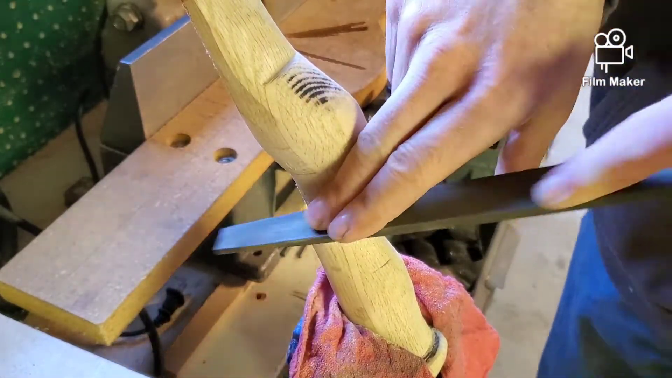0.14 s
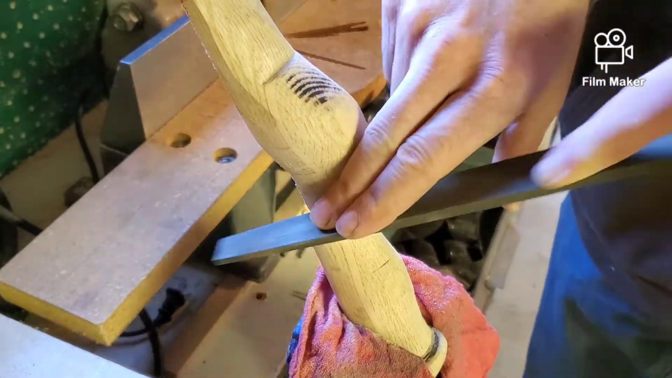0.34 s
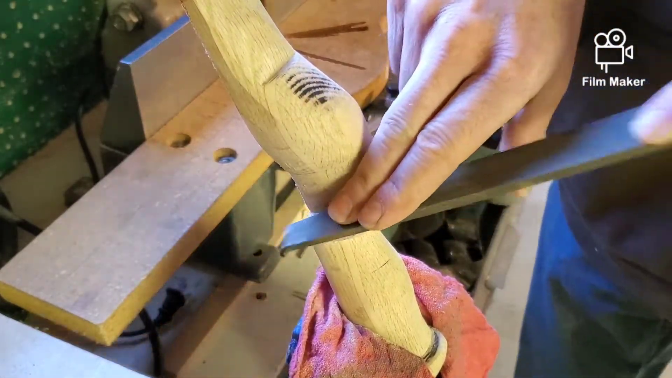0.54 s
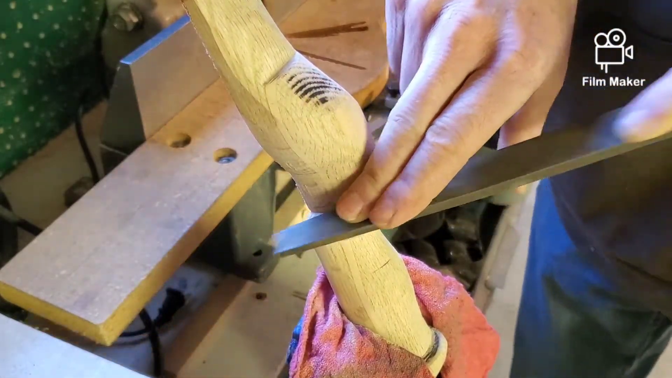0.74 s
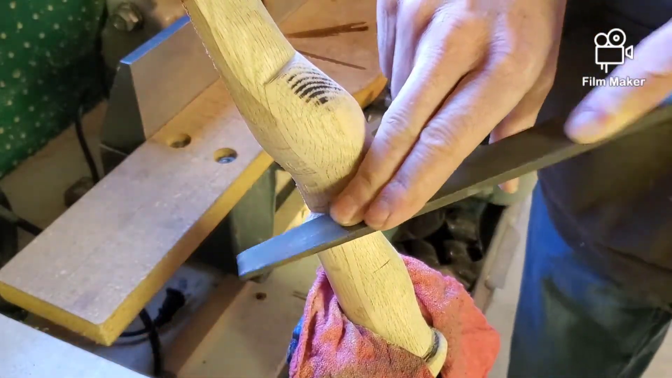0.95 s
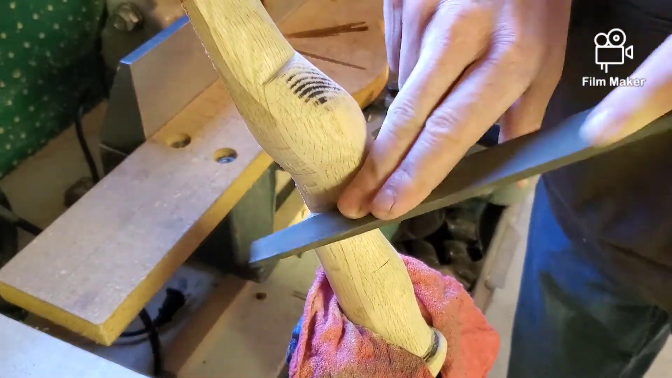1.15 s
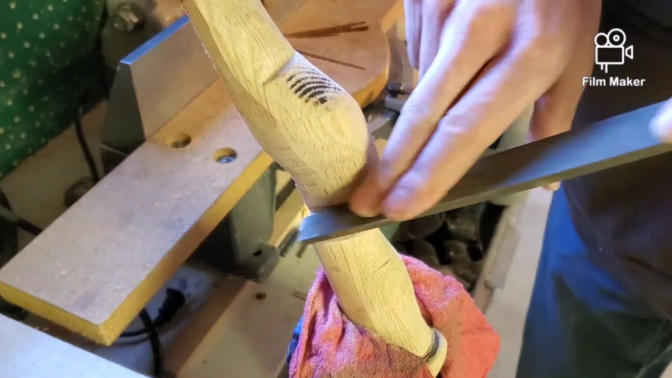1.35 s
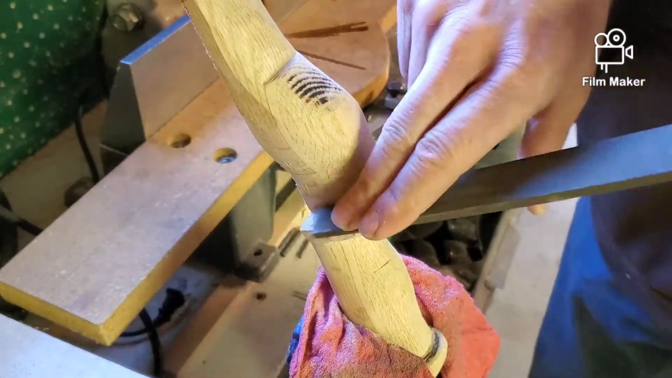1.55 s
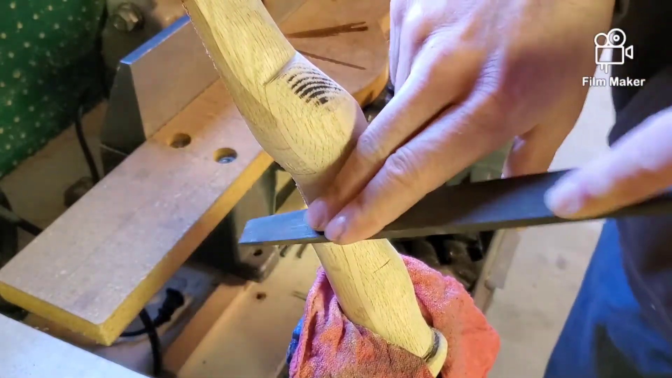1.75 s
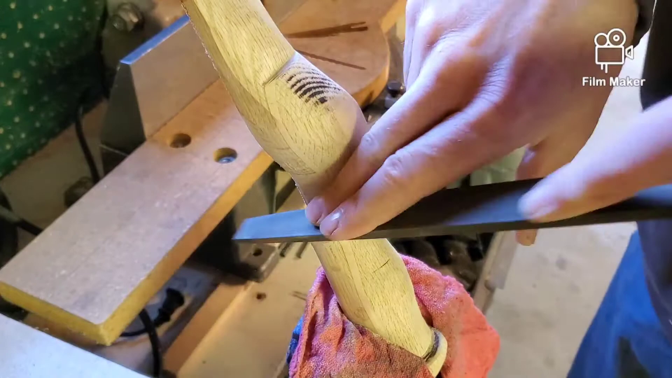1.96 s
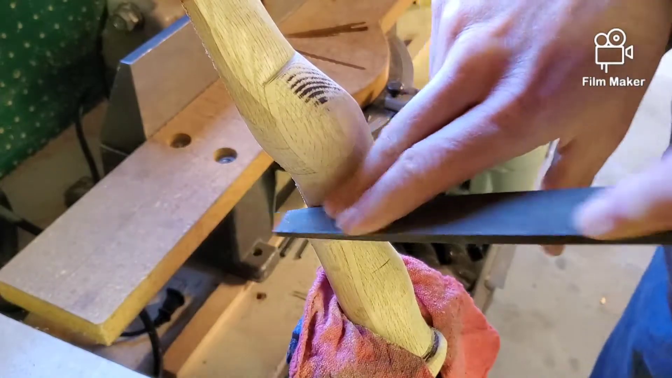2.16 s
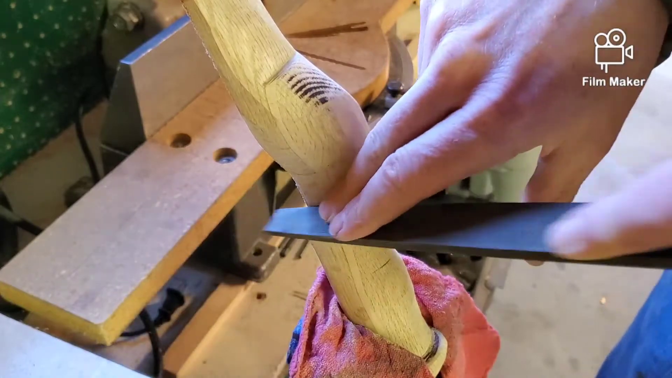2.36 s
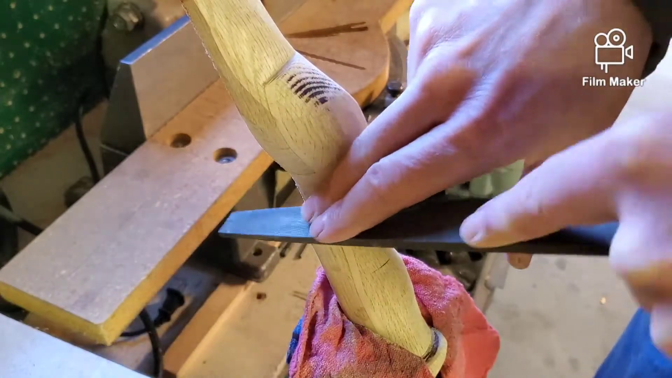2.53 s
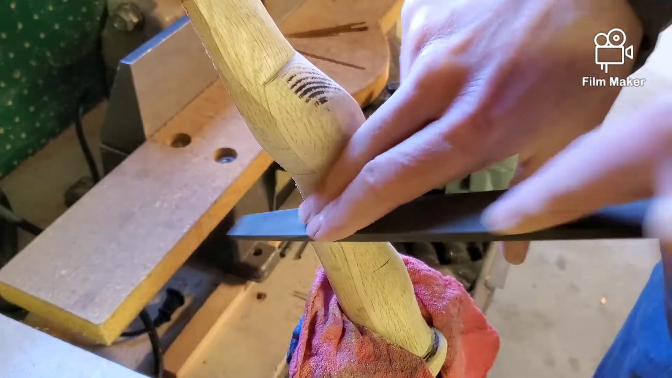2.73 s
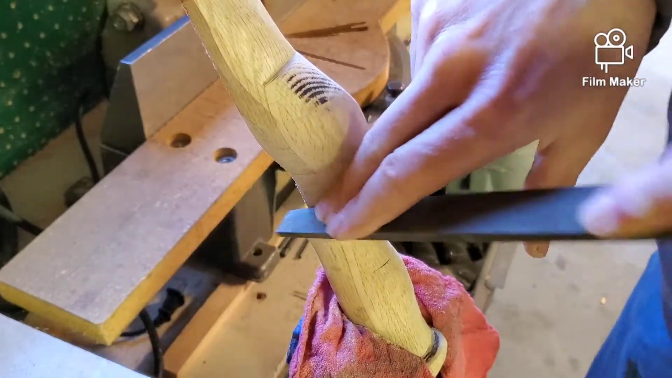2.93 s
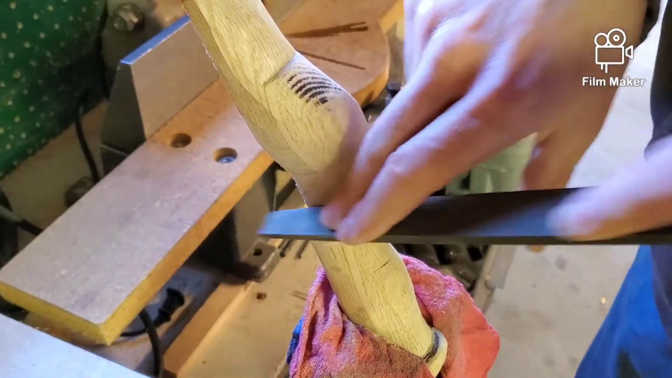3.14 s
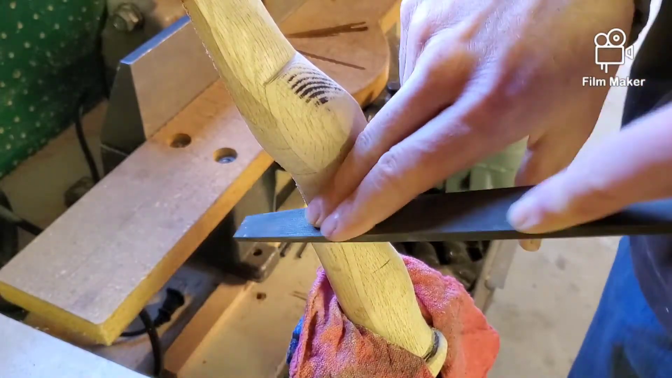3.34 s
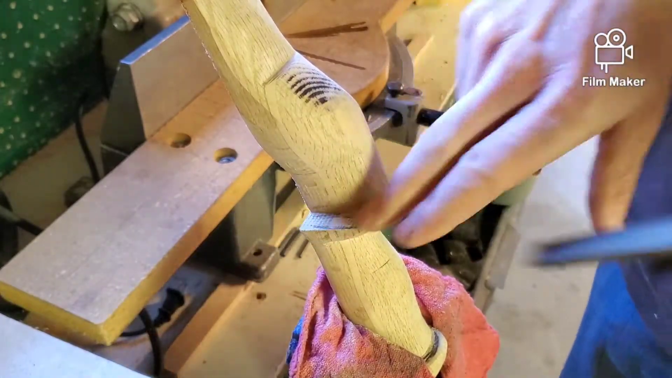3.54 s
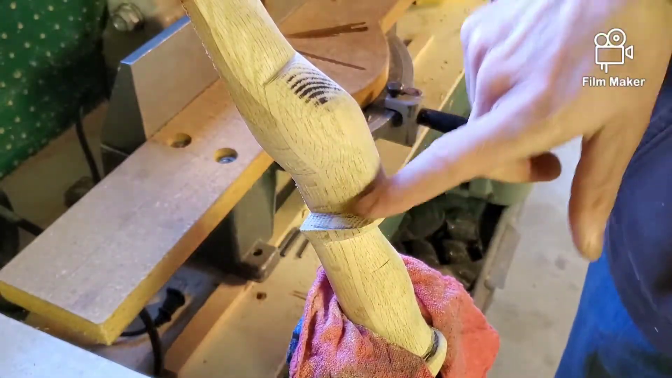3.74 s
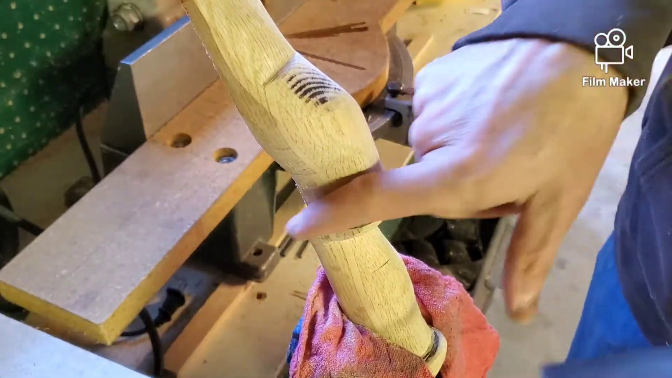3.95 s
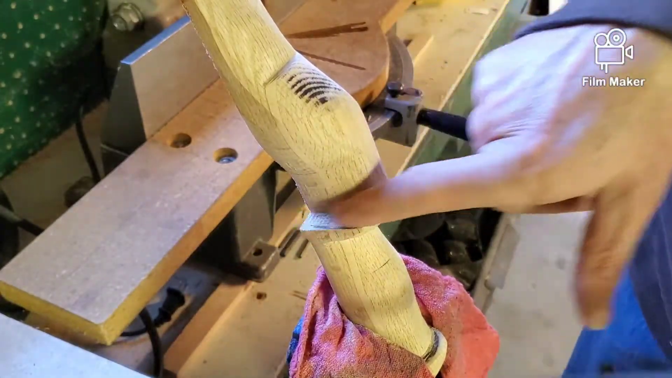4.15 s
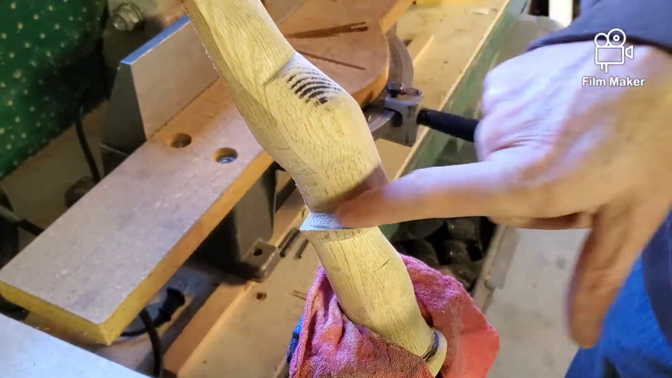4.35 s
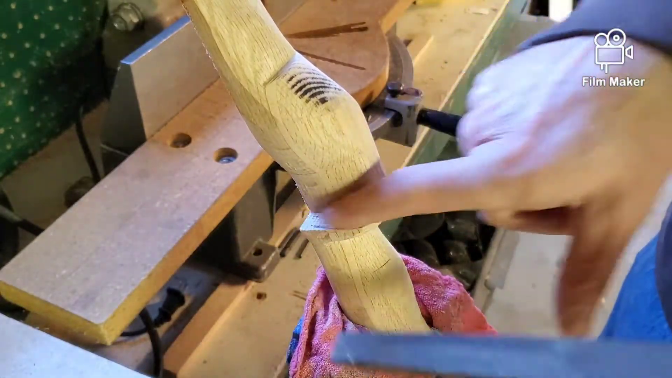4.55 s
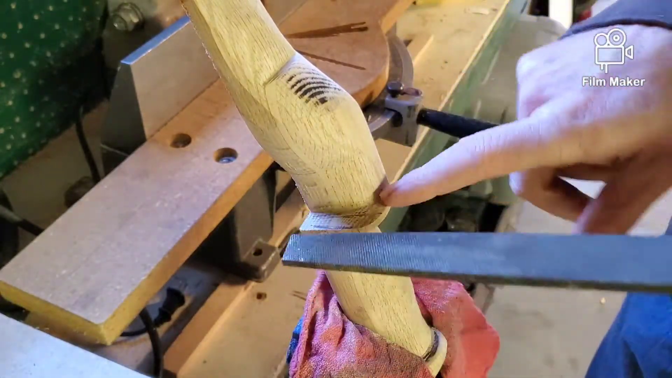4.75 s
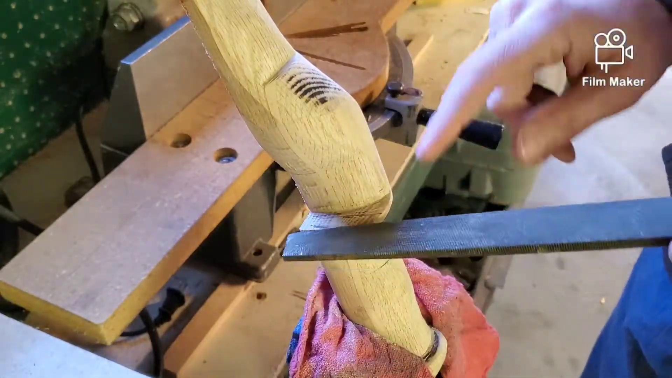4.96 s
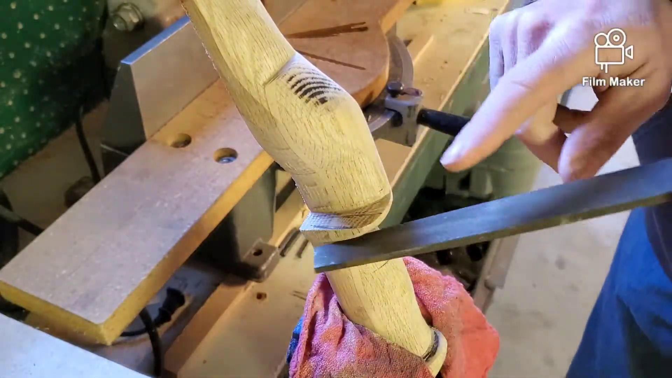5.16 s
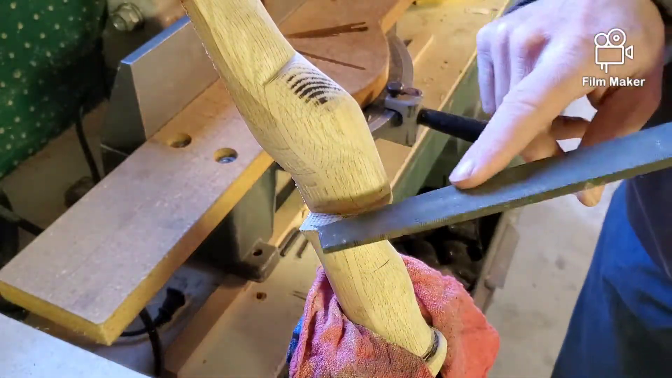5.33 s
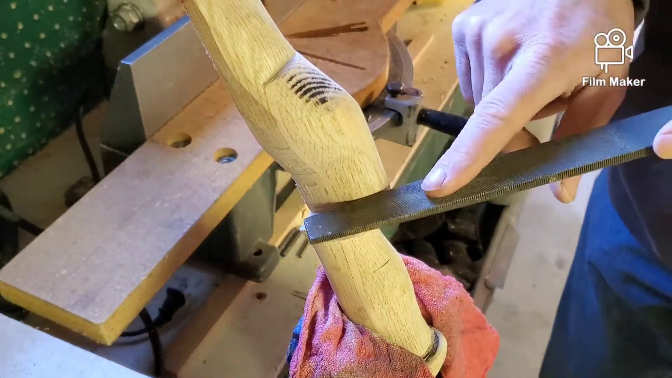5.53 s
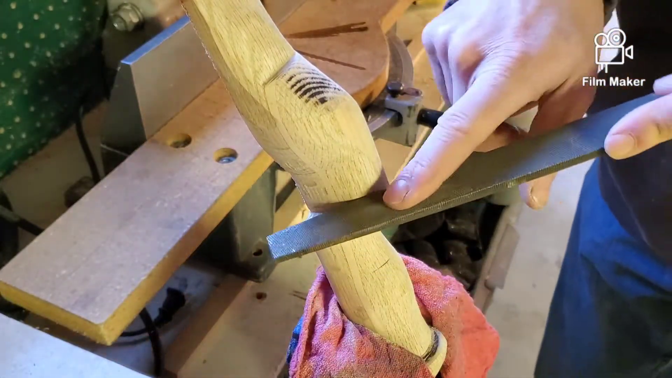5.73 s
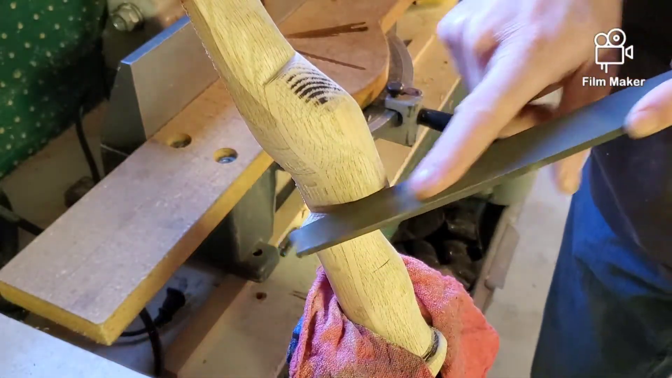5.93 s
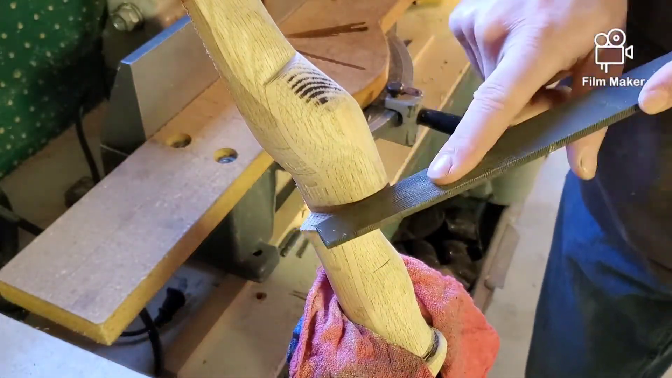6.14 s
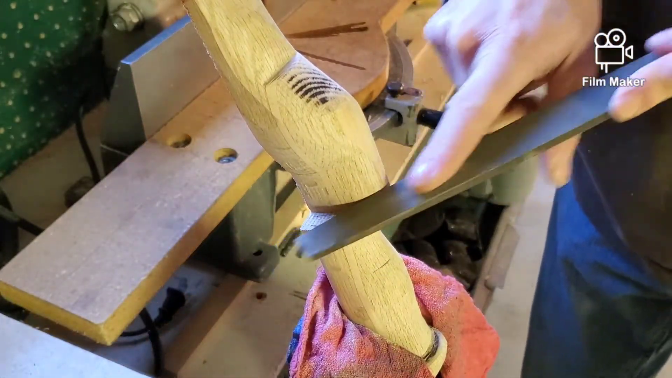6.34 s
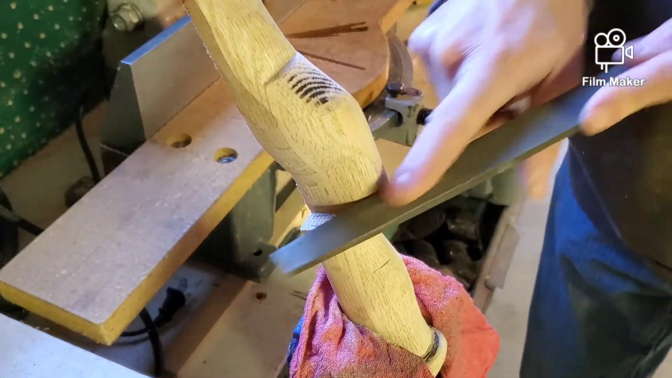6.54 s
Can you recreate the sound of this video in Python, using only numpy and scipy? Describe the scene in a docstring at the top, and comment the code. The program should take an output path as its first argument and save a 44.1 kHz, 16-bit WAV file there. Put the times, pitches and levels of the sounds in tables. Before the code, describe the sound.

Close up in a small workshop, a flat steel file rasps fast over a wooden handle, about seven or eight strokes a second, with woody hum, knocks and short squawks. It stops; a fingertip makes very faint papery wipes and a soft nudge. The file lightly grazes, makes two muted separate passes, then returns to fast, loud rasping.

```python
"""Rapid rasping strokes, a pause with papery wipes, a soft nudge and a faint graze, then strokes again.
A flat steel file is pushed to and fro across a wooden handle held in a vise, in a small workshop.
Uneven slips of the teeth ring modes of handle, bench and file; coloured noise is the hiss of fine dust.
Landings and catches are noise bursts into the same modes; squawks are gliding tones; wipes are slips and hiss.
A short room tail and a quiet noise floor lie behind, heard at two close microphone ports."""
import sys
import numpy as np
from scipy import signal
from scipy.fft import rfft, irfft
from scipy.io import wavfile
from scipy.ndimage import uniform_filter1d

SR = 44100
rng = np.random.default_rng(int(sys.argv[2]) if len(sys.argv) > 2 else 0)


def file_out(sig):
    """Save sig as 16-bit WAV at sys.argv[1]."""
    # one column per channel
    cols = np.atleast_2d(sig).T
    # limit, then scale
    lim = np.clip(cols, -1, 1)
    pcm = np.round(lim * 32767).astype(np.int16)
    wavfile.write(sys.argv[1], SR, pcm)


N = 295029

# Levels in the tables are drives, ahead of the gains and colouring in the functions.
# Passes of the file, turn to turn. Each row: start in seconds, end in seconds, fastest point 0-1,
# hardest point 0-1, dust hiss in dB, file in dB, handle in dB, bench in dB.
SLIDES = [(-.09, .032, 0.79, 0.67, -52, -40, -26.5, -34.5),
          (.028, .157, .7, 0.48, -53, -35.5, -27.5, -32.5), (.165, .295, 0.64, 0.59, -48, -33, -29, -39.5),
          (.305, .42, 0.5, 0.57, -51, -33.5, -28.5, -33), (.423, .561, 0.52, 0.45, -50, -36.5, -30, -44),
          (.567, .686, 0.34, 0.7, -51, -37, -35, -41.5), (.699, .84, 0.46, 0.52, -50, -33, -26.5, -38.5),
          (.835, .961, 0.3, 0.41, -51.5, -35, -23.5, -38.5),
          (.963, 1.108, 0.51, 0.56, -56.5, -36, -29, -46),
          (1.103, 1.236, 0.61, 0.58, -51.5, -41, -29.5, -37.5),
          (1.237, 1.366, .25, 0.45, -47.5, -38, -30.5, -36.5),
          (1.371, 1.489, 0.41, 0.57, -50, -38.5, -29, -41.5),
          (1.489, 1.623, 0.41, 0.5, -50, -32.5, -26.5, -37),
          (1.624, 1.745, 0.46, 0.52, -49.5, -33.5, -27.5, -34.5),
          (1.755, 1.9, 0.33, 0.5, -48.5, -35, -28.5, -38),
          (1.902, 2.022, 0.45, 0.41, -56.5, -39, -31, -35.5),
          (2.026, 2.152, 0.29, 0.47, -52, -39.5, -31.5, -35.5),
          (2.157, 2.281, 0.52, 0.54, -56, -39, -32, -46), (2.281, 2.433, 0.43, .45, -53, -40, -34.5, -40.5),
          (2.434, 2.558, 0.55, 0.5, -53, -39.5, -28, -35), (2.56, 2.699, .6, 0.51, -53, -39.5, -32, -37.5),
          (2.7, 2.827, 0.51, 0.52, -53.5, -33, -29.5, -43.5),
          (2.826, 2.96, 0.61, 0.57, -52, -35, -30, -40.5),
          (2.964, 3.095, 0.58, 0.51, -52, -31.5, -26.5, -38.5),
          (3.093, 3.231, 0.44, 0.56, -51.5, -35.5, -31, -43),
          (3.233, 3.381, .5, 0.5, -53, -31.5, -27.5, -38),
          (3.382, 3.516, .2, 0.42, -51.5, -35.5, -29.5, -37.5),
          (3.51, 3.638, 0.82, 0.42, -50, -33.5, -29, -35.5),
          (3.642, 3.766, 0.7, 0.27, -68.5, -61, -53, -56),
          (5.033, 5.2, 0.28, 0.34, -68.5, -49.5, -39.5, -39),
          (5.228, 5.419, 0.4, 0.17, -79.5, -65.5, -38, -50.5),
          (5.63, 5.79, 0.4, 0.27, -90, -46.5, -38.5, -43), (5.785, 5.921, 0.58, 0.47, -63, -50.5, -37, -42),
          (5.92, 6.059, 0.63, 0.62, -58.5, -50.5, -36.5, -41),
          (6.059, 6.191, 0.5, .52, -51.5, -40, -34, -39),
          (6.189, 6.304, 0.41, 0.47, -50, -37.5, -25.5, -36),
          (6.305, 6.421, .58, .5, -48.5, -39.5, -35.5, -41),
          (6.422, 6.548, 0.46, 0.49, -52.5, -41.5, -27.5, -41.5),
          (6.553, 6.656, 0.51, 0.49, -47.5, -35.5, -32, -38.5),
          (6.66, 6.78, 0.62, 0.45, -47.5, -28.5, -22.5, -44.5)]
# Moments when the handle chatters at one pitch. Each row: middle in seconds, first Hz, last Hz,
# level in dB, length scale in ms.
SQUAWKS = [(0.008, 273, 287, -25, 24.0), (0.375, 448, 475, -30.5, 38.0), (0.539, 349.5, 257.6, -29.5, 18.0),
           (0.794, 658, 614, -32, 30.0), (1.68, 913, 925, -28, 40.0), (1.881, 249.4, 257.1, -33, 54.0),
           (2.077, 335, 267, -30.5, 28.0), (2.199, 652, 686, -28.5, 30.0), (2.405, 292.5, 299, -29, 36.0),
           (2.656, 281.4, 358.4, -26.5, 40.0), (2.935, 312.6, 300.4, -23, 24.0),
           (3.207, 302, 310.9, -22.5, 16.0), (3.32, 542, 648, -28.5, 36.0), (3.436, 337, 269, -28, 56.0),
           (4.51, 439, 437, -62, 50.0), (6.1, 1000.0, 794, -33, 40.0), (6.128, 734, 726, -23.5, 18.0),
           (6.176, 713, 597, -36, 60.0), (6.364, 795, 736, -25, 32.0), (6.463, 692, 598, -30, 22.0),
           (6.597, 705.6, 712, -22.5, 22.0)]
# The file lands or jolts. Each row: start in seconds, file level in dB, handle and bench in dB re file.
KNOCKS = [(.0563, -20.5, -16.5), (0.5358, -29, -5), (0.5802, -16.5, -15), (.601, -18, -6),
          (0.6204, -21, -9), (.849, -24, -11), (1.0211, -29.5, -9), (1.3138, -25, -3), (1.3867, -19, -12.5),
          (1.4092, -27.5, -5.5), (1.5434, -28, -22), (1.6415, -19.5, -9.5), (1.945, -25, -5.5),
          (2.004, -30.5, -4), (2.0501, -25, -11), (2.0821, -28, -4), (2.172, -26.5, -10),
          (2.196, -28, -1.5), (2.4494, -27.5, -9), (2.5401, -19.5, -17.5), (2.5914, -19, -11),
          (2.7201, -20, -11), (2.743, -22, -10), (2.9887, -22, -11), (3.252, -29.5, -9),
          (3.2738, -25.5, -6), (3.2892, -18.5, -10.5), (3.5316, -14, -15.5), (5.0381, -45.5, 13),
          (5.0486, -25, -10), (5.2289, -46, 17.5), (5.236, -37, -4), (5.6224, -54, 11), (5.6349, -24.5, -4),
          (5.6435, -24, -12), (6.2057, -30, -6), (6.4507, -16, -9.5), (6.5939, -30.5, -0.5),
          (6.6065, -24.5, -18.5)]
# The teeth dig in mid-stroke; the row at 3.003 s is a sharp jolt, given the same swell. Each row: start in
# seconds, file level in dB, handle and bench in dB re file.
CATCHES = [(.347, -18.5, -15), (.497, -25, -9), (.77, -17.5, -18), (.868, -29.5, -6.5), (2.476, -25, -10),
           (3.003, -19, -14), (3.173, -22.5, -16), (3.3, -17, -18), (6.626, -25, -8)]
# Single wipes of a fingertip. Each row: start in seconds, end in seconds, fastest point 0-1,
# hiss in dB, handle in dB, bench in dB.
WIPES = [(3.7, 3.788, 0.2, -66, -74, -61), (3.926, 4.168, 0.69, -59, -78.5, -74.5),
         (4.177, 4.41, 0.47, -56, -74, -78), (4.414, 4.621, 0.76, -57, -78, -78),
         (4.618, 4.849, 0.37, -58.5, -82, -72.5)]
# The file's tip grazes the wood before it is set down. Each row: time in seconds, level in dB.
GRAZE = [(4.93, -99), (4.98, -71), (5.03, -65), (5.037, -55)]

# Modes of bench, wooden handle, file, and the file's high range. Each row: frequency in Hz, width in Hz,
# relative level in dB, left minus right in dB, right port lag in ms.
BENCH = [(60, 24, -8, -2.5, .2), (72, 16.8, 1.5, 2, 0.16), (88, 10.7, 2.5, -4.5, 0.44),
         (125, 48, -6.5, 0.5, .2), (150.4, 12, 2, 0.5, 0.14), (184, 33, -8.5, 3.5, 0.18)]
HANDLE = [(240.4, 22, 2.5, 0, 0.6), (294.6, 27, -2.5, 1, 0.094), (345.5, 32, -1.5, 2, .3),
          (454, 22, -7, 0, 0.19), (490, 62, -6.5, 1, 0.59), (594.8, 21.7, -4, 5.5, .25),
          (645.4, 18, 2, 0, 0.33), (769, 68, -5.5, 0.5, 0.22), (853, 37, 2, -4, 0.31),
          (928, 13, -7.5, 7, 0.16), (967, 34, -3.5, 8, .25), (914, 1100, -13.5, 2, 0.23)]
FILE = [(1176, 100, -3.5, -6, 0.25), (1383, 27, 4, -0.5, 0.22), (1564, 70, -1, -7, 0.17),
        (1754, 90, -3.5, -8.5, 0.2), (1933, 63, 6, 0.5, 0.2), (2280, 142, -3.5, -4, 0.056),
        (2423, 32, -1, -5, 0.03), (2834, 120, -5, -9, 0.012), (3296, 80, 2.5, -4.5, 0.22),
        (3774, 110, 0.5, -1, 0.2), (4340, 97, -7, -5, 0.076), (4894, 96, -14.5, 3, 0.053),
        (5500, 23, -17, -4.5, 0.09), (5490, 60, -18, 0.5, 0.22), (6230, 120, -21, -0.5, 0.22),
        (2680, 2100, -10, 2.5, .2), (5060, 4400, -21, -4.5, 0.22)]
SHEEN = [(6160, 89, -10, 0.5, .2), (7360, 82, 1, 0.5, .2), (8430, 120, -0.5, -1.5, 0.17),
         (9350, 120, -11.5, -0.5, 0.2), (11700, 170, -1, -0.5, 0.084)]

# Noise colours of dust, wiped skin, contact snap and shop air. Each row: frequency in Hz, relative dB per Hz.
DUST_COLOUR = [(2500, -25.5), (5000, -7), (6500, -7.5), (8000, -8.5), (9400, -11.5), (10800, -16),
               (13200, -7), (14600, -16), (15500, -12.5)]
WIPE_COLOUR = [(900, -25), (1500, -20), (2400, -15), (3300, -8), (3800, -2.5), (4400, -9), (5000, -5.5),
               (9000, -7.5), (11000, -8), (13000, -5), (15500, -5)]
CRACK_COLOUR = [(1500, -20), (3000, -3), (4500, 0), (6000, -6.5), (9000, -24)]
FLOOR = [(18, -37), (30, -5), (92, -4.5), (534, -23.5), (732, -19.5), (1560, -28), (1740, -26), (1980, -29),
         (5790, -34), (6950, -15), (8580, -24), (10600, -35), (15700, -27)]
# Room tail by band. Each row: frequency in Hz, time to fall 60 dB in seconds, level in dB.
ROOM = [(83, 0.25, -0.5), (296, 0.39, -4), (1000, 0.15, -6), (2500, 0.25, -6), (4870, 0.19, -21.5),
        (10040, 0.06, -14)]
# Microphone response. Each row: frequency in Hz, gain in dB.
MICROPHONE = [(20, -9.5), (55, -1), (1000, -1)]

TOOTH_SLOW_HZ, TOOTH_FAST_HZ = 291.5, 620.6  # mean tooth-row rate at a turn and at full speed
SETTLE_S, LINGER_S, LINGER_DB = 0.0049, .13, -28.5  # bench follows the hand; a faint tremble stays longer
TICK_DB = 1.5  # first tick of a landing, re its rattle
CRACK_DB, CRACK_S = -14, .0015  # bright snap of a landing
CATCH_PEAK_S = .009  # start to hardest
BUMP_START_S, BUMP_RISE_S, BUMP_FALL_S = 4.425, 0.026, 0.031  # the hand nudges the handle
BUMP_HANDLE_DB, BUMP_BENCH_DB = -51, -44.5
HISS_LAG_SAMPLES = 9
FLOOR_DB = -70.5
TOP_HZ = 15740


def strokes():
    """Rows of teeth pass at the tooth rate and hum through the handle; single slips ring everything."""
    dust, steel, bite, shake, tooth_hz = slides()
    phase = 2 * np.pi * np.cumsum(tooth_hz * (1 + 0.0406 * walk(150))) / SR
    judder = walk(45)  # the grip of the teeth comes and goes
    teeth = np.sin(phase) * undb(-20.5 + 1.3 * walk(30))

    handle_force = bite * undb(2.0 * judder) * (grains(1500, 0.66) + teeth)
    handle = ring(handle_force, HANDLE, sway_db=2.5)
    bench = ring(shake * grains(400, 1.5), BENCH)

    gate = 1 + 0.36 * np.cos(phase)  # slips bunch once a tooth row
    file_force = steel * undb(1.5 * judder) * gate * grains(5000, 1.8)
    file_ring = ring(file_force, FILE, sway_db=3.5)

    fine = grains(12000, 1.3)
    sheen = undb(-10.5) * ring(dust * fine, SHEEN)
    rasp = hiss(fine, 0.81, DUST_COLOUR) * dust * undb(1.7 * judder)
    return undb(-1.5) * handle + bench + undb(1.5) * file_ring + undb(7.0) * rasp + sheen


def slides():
    """Dust and tooth rate follow speed; file and handle need pressure; the bench shakes all along."""
    dust, steel, wood, shake, pace = np.zeros((5, N))
    for start_s, end_s, fastest, hardest, dust_db, file_db, handle_db, bench_db in SLIDES:
        at, way, speed = swell(start_s, end_s, fastest)
        dust[at] = undb(dust_db) * speed ** 0.99
        steel[at] = undb(file_db) * speed ** 0.36 * np.exp(-6.5 * (way - hardest) ** 2)
        wood[at] = undb(handle_db) * np.exp(-7.5 * (way - hardest) ** 2)
        shake[at] = undb(bench_db) * np.exp(-.8 * way)  # strongest just after the file turns
        pace[at] = speed
    t = np.arange(SR) / SR
    lag = np.exp(-t / SETTLE_S) / SETTLE_S + undb(LINGER_DB) * np.exp(-t / LINGER_S) / LINGER_S
    shake = signal.fftconvolve(shake, lag / SR)[:N]
    tooth_hz = TOOTH_SLOW_HZ + (TOOTH_FAST_HZ - TOOTH_SLOW_HZ) * pace
    return dust, steel, uniform_filter1d(wood, SR // 100), shake, tooth_hz


def swell(start_s, end_s, fastest):
    """Mask of one movement's samples, the share of the way done, and its speed 0-1."""
    t = np.arange(N) / SR
    at = (t > start_s) & (t < end_s)
    way = (t[at] - start_s) / (end_s - start_s)
    half_turn = np.interp(way, [0, np.clip(fastest, .05, .95), 1], [0, .5, 1])
    return at, way, np.sin(np.pi * half_turn)


def squawks():
    """Stick and slip lock to one gliding pitch, swell and let go."""
    out, t = np.zeros((2, N)), np.arange(N) / SR
    waver, rough = 0.026 * walk(120), undb(1.4 * walk(200))
    for middle_s, first_hz, last_hz, level_db, ms in SQUAWKS:
        first = max(int((middle_s - ms / 500) * SR), 0)
        at = slice(first, int((middle_s + ms / 500) * SR))
        x = (t[at] - middle_s) * 1000 / ms  # in lengths from the middle
        glide_hz = first_hz + (last_hz - first_hz) * np.clip(x + .5, 0, 1)
        hz = glide_hz * (1 + waver[at])
        right_lag = np.outer([0, .25 / 1000], hz)  # in cycles: the right port hears it later
        phase = 2 * np.pi * (np.cumsum(hz) / SR - right_lag)
        tone = np.sin(phase) + 0.037 * np.sin(2 * phase)
        out[:, at] += undb(level_db) * np.exp(-3.0 * x ** 2) * rough[at] * tone
    return out


def knocks():
    """A landing is a tick, bright snap, rattle and faint settling; a catch swells; all three bodies feel both."""
    steel, wood, snap = np.zeros((3, N))
    t = np.arange(SR // 5) / SR
    rattle = np.exp(-t / 0.0088)
    tick = undb(TICK_DB) * np.exp(-t / 0.0013)
    settling = undb(-23.5) * np.exp(-t / .07)
    crack = undb(CRACK_DB) * np.exp(-t / CRACK_S)
    crunch = t / CATCH_PEAK_S * np.exp(1 - t / CATCH_PEAK_S)

    kinds = ((KNOCKS, rattle + tick + settling, crack), (CATCHES, crunch, undb(-24) * crunch))
    for rows, shape, bright_shape in kinds:
        for start_s, file_db, wood_db in rows:
            i = int(start_s * SR)
            at, n = slice(i, i + len(t)), N - i
            burst = (rng.standard_normal(len(t)) * shape)[:n]
            steel[at] += undb(file_db) * burst
            wood[at] += undb(file_db + wood_db) * burst
            snap[at] += undb(file_db) * bright_shape[:n]

    pressed = np.array(FILE) * [1, 1.2, 0.94, 0.87, 1.038]  # steel against wood rings shorter
    soften = signal.butter(2, 7500, fs=SR, output="sos")  # wood yields: no blow is quite sharp
    file_ring = ring(signal.sosfilt(soften, steel), pressed)
    bright = snap * hiss(rng.standard_normal(N), 1.5, CRACK_COLOUR)
    handle, bench = ring(wood, HANDLE), ring(wood, BENCH)
    return bright + undb(-4.0) * file_ring + undb(3.5) * handle + undb(1.0) * bench


def wipes():
    """Skin on rough wood: papery hiss, faint handle and bench murmur, one nudge; then the file's light graze."""
    on, handle, bench = np.zeros((3, N))
    for start_s, end_s, fastest, hiss_db, handle_db, bench_db in WIPES:
        at, _, speed = swell(start_s, end_s, fastest)
        on[at] = undb(hiss_db) * speed ** 1.16
        handle[at] = undb(handle_db) * speed ** .7
        bench[at] = undb(bench_db) * speed ** .7
    paper = on * undb(1.2 * walk(60)) * hiss(grains(8600, 1.2), 0.38, WIPE_COLOUR)

    since_s = np.clip(np.arange(N) / SR - BUMP_START_S, 0, None)
    bump = (1 - np.exp(-since_s / BUMP_RISE_S)) * np.exp(-since_s / BUMP_FALL_S)
    drag = grains(700, 0.98)
    handle_ring = ring(drag * (handle + undb(BUMP_HANDLE_DB) * bump), HANDLE)
    soft = shaped(handle_ring, [(250, 5.5), (1000, -5.5)])  # a soft touch moves the low modes most
    bench_ring = ring(drag * (bench + undb(BUMP_BENCH_DB) * bump), BENCH)

    graze = inside(GRAZE, 0.0049) * undb(curves(GRAZE)[0]) * grains(3000, 1.33)
    return paper + soft + bench_ring + ring(graze, HANDLE[-3:] + FILE[:5])


def room(x):
    """Walls answer with a dense tail, unrelated left and right except in the bass; the treble dies first."""
    t = np.arange(SR * 3 // 5) / SR
    onset = np.clip((t - .003) / .01, 0, 1)  # first walls are a metre or two away
    tail = 0
    for hz, t60_s, level_db in ROOM:
        band = [(row[0], 0 if row[0] == hz else -12) for row in ROOM]
        fade = undb(-60 * t / t60_s) * onset
        noise = rng.standard_normal((2, len(t))) * fade / np.sqrt(np.sum(fade ** 2))
        tail = tail + undb(level_db) * shaped(noise, band)
    mid, side = tail[0], shaped(tail[1], [(60, -23.0), (250, -6), (800, 2)])
    pair = np.array([mid + side, mid - side]) / np.sqrt(2)
    return signal.fftconvolve(x.mean(0)[None], pair, axes=1)[:, :N]


def shop_air():
    """Quiet of the shop: coloured noise whose long waves are alike at both ports."""
    bass, rest = rng.standard_normal(N), rng.standard_normal((2, N))
    air = shaped(bass, [(150, -3.5), (600, -24)]) + shaped(rest, [(150, -17.5), (600, -3)])
    return unit(shaped(air, FLOOR)) * undb(FLOOR_DB)


def ring(force, modes, sway_db=0):
    """A force rings decaying modes, each with its own port balance and lag. Gain 1 for white force."""
    hz, width_hz, db, pan_db, lag_ms = np.transpose(modes)[:, :, None]
    sign = (-1) ** np.arange(len(modes))[:, None]  # neighbours move in opposite phase
    side = np.array([1, -1])[:, None, None]
    t = np.clip(np.arange(SR // 4) / SR - (side < 0) * lag_ms / 1000, 0, None)
    decay = width_hz * np.exp(-np.pi * width_hz * t)
    each = sign * undb(db + side * pan_db / 2) * decay * np.sin(2 * np.pi * hz * t)
    each /= np.sqrt(np.sum(each.sum(1) ** 2) / 2)
    if not sway_db:
        return signal.fftconvolve(force[None], each.sum(1), axes=1)[:, :N]
    # the point of contact wanders: every third mode together gets more or less force
    out = 0
    for k in range(3):
        share = force * undb(sway_db * walk(25))
        out = out + signal.fftconvolve(share[None], each[:, k::3].sum(1), axes=1)[:, :N]
    return out


def hiss(common, alike, colour):
    """Coloured noise, partly the same at both ports; the right one is a little further away."""
    shared = alike * np.array([common, np.roll(common, HISS_LAG_SAMPLES)])
    return unit(shaped(shared + rng.standard_normal((2, N)), colour))


def grains(per_s, spread_db):
    """Random slips of very uneven size, rms 1."""
    hit = rng.random(N) < per_s / SR
    return unit(hit * rng.standard_normal(N) * undb(spread_db * rng.exponential(size=N)))


def walk(rate_hz):
    """Random levels, one every 1 / rate_hz seconds, joined by slews; rms 1."""
    k = int(SR / rate_hz)
    steps = np.repeat(rng.standard_normal(N // k + 1), k)
    return unit(uniform_filter1d(steps, k)[:N])


def shaped(x, points):
    """Colour x by (Hz, dB) points."""
    hz, db = np.transpose(points)
    f = np.fft.rfftfreq(x.shape[-1], 1 / SR)
    gain = undb(np.interp(np.log(f + 1), np.log(hz), db))
    return irfft(rfft(x) * gain, x.shape[-1])


def curves(rows):
    """Columns of a table after the time, joined by straight lines, one value a sample."""
    s, *columns = np.transpose(rows)
    return [np.interp(np.arange(N) / SR, s, c) for c in columns]


def inside(rows, fade_s):
    """1 within the table's times, fading to 0 outside."""
    t = np.arange(N) / SR
    on = 1. * (t >= rows[0][0]) * (t <= rows[-1][0])
    return uniform_filter1d(on, int(fade_s * SR))


def undb(db):
    """dB to gain."""
    return 10 ** (np.asarray(db) / 20)


def unit(x):
    """Scale to rms 1."""
    return x / np.sqrt(np.mean(x ** 2))


def scene():
    """Work at the vise, its echo and the quiet of the shop."""
    near = strokes() + squawks() + knocks() + wipes()
    return near + room(near) + shop_air()


def record(dry):
    """Two close ports hear long waves alike; the microphone thins the deepest bass and the top is cut."""
    mid, side = dry.mean(0), shaped((dry[0] - dry[1]) / 2, [(60, -10.5), (300, -1)])
    pair = shaped(np.array([mid + side, mid - side]), MICROPHONE)
    top_cut = signal.ellip(14, .2, 60, TOP_HZ, fs=SR, output="sos")
    return signal.sosfilt(top_cut, pair)


dry = scene()
out = record(dry)
file_out(out)
```